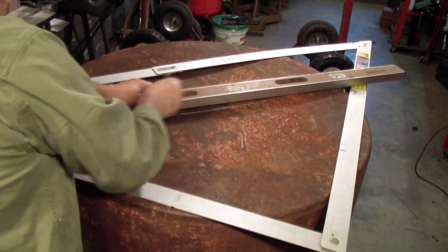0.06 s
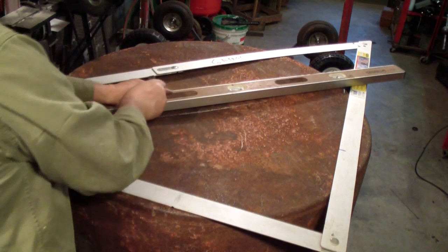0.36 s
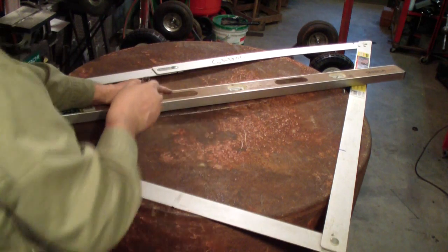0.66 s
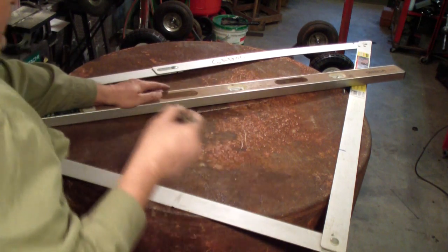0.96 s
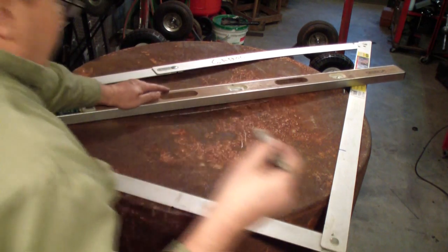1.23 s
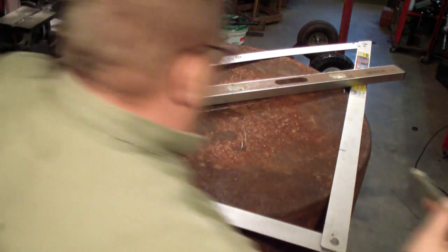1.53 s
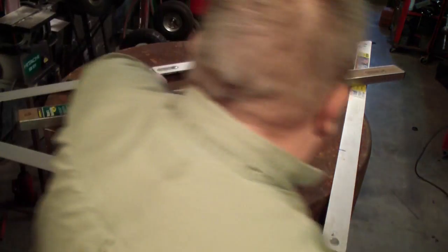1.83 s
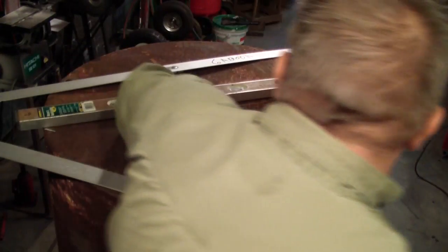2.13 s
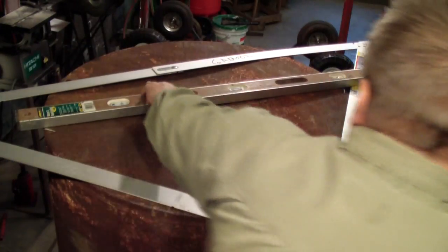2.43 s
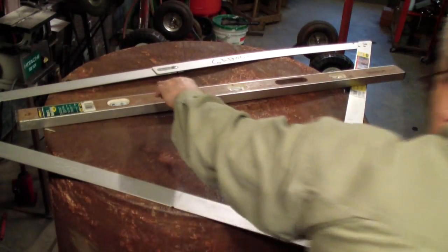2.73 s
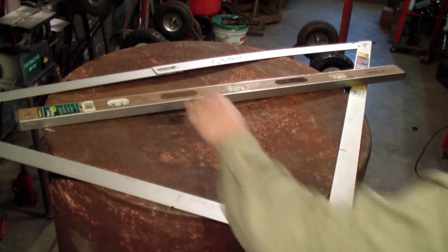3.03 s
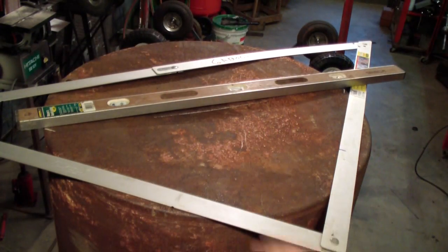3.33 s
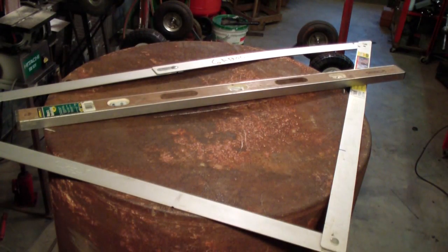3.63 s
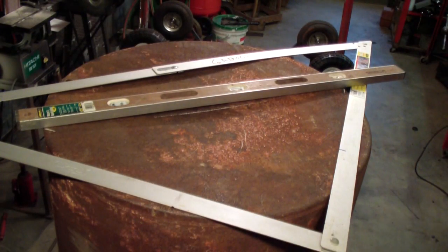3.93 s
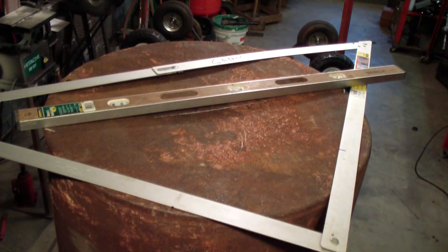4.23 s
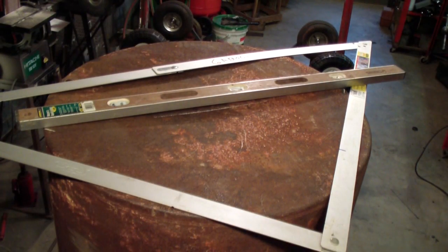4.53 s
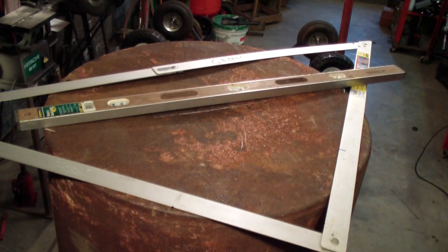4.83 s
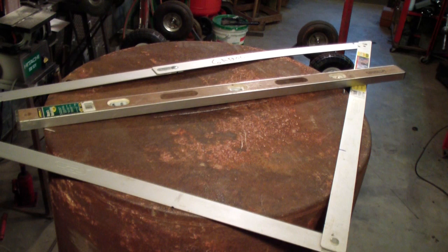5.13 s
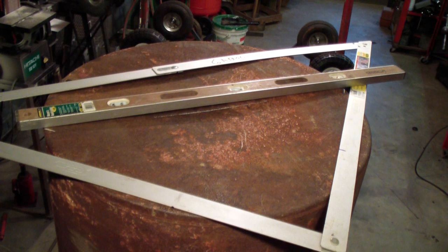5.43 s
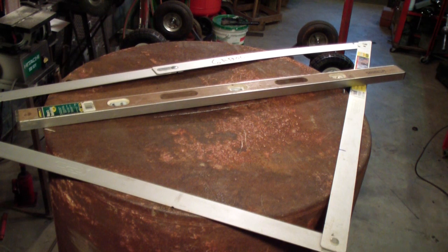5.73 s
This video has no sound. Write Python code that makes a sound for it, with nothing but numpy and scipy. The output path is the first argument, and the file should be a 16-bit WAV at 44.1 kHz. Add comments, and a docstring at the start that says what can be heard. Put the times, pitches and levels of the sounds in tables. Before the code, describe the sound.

It opens at once with chalk dragged hard along a straightedge on a big steel tank: a gritty hiss with tiny squeaks over a loud, hollow metallic roar. The stroke stops at about 0.4 seconds and the tank rings on, fading over two to three seconds. Metal rules give light, tinkling clicks near 0.5 and 1.7 seconds. A sleeve rustles softly from about 1.3 seconds on, and a few dull knocks come between 2.4 and 2.8 seconds. At 3 and 3.25 seconds a hand brushes over the rust in two quick, dry swipes, the first stronger. A shoe scuffs on gritty concrete near 3.9 seconds, then more faintly around 4.6. A small knock and click come at about 5.4 seconds. A lens motor chirps very faintly near 2.2 and 4.3 seconds. Everything is close, over a low rumble and the quiet air of a workshop.

```python
"""Chalk on a steel tank

Chalk is dragged hard along a straightedge on a big rusty steel tank in a workshop. Its tiny fractures
force the shell into vibration: the tank roars, then rings on in its natural modes. Friction sounds as
a hand brushes twice over the rust, a sleeve rustles and shoes scuff on concrete. Small impacts click
and knock, and a lens motor chirps faintly over a low rumble and the quiet air of the room."""
import sys
import numpy as np
from scipy import signal
from scipy.fft import rfft, irfft, next_fast_len
from scipy.io import wavfile

SR = 44100
rng = np.random.default_rng(int(sys.argv[2]) if len(sys.argv) > 2 else 0)


def materialize(psi):
    """Save the field psi as 16-bit PCM at rate SR to the path in sys.argv[1].

    A 1-D psi becomes a single channel; in a 2-D psi each row is a channel.
    """
    bounded = np.clip(np.atleast_2d(psi).T, -1, 1)
    quanta = np.round(bounded * 32767).astype(np.int16)
    wavfile.write(sys.argv[1], SR, quanta)


N = 258847
TIME = np.arange(N) / SR
LEAD, RINGING = SR // 2, 3 * SR + SR // 2   # samples of tank vibration before and after 0 s

# strongest modes of the shell: (frequency [Hz], relative level [dB], decay time T60 [s])
TANK_MODES = [(43.3, -41.5, 0.46), (60.1, -36, 3), (142.5, -49.5, 6), (167.1, -44, 4.73), (224.2, -43, 3.4),
              (244.5, -41.5, 1.7), (267.3, -43, 3), (287.6, -34.5, 0.35), (296, -46, 6.7),
              (315.7, -40, 2.4), (356, -36, 2.85), (418.3, -36, 3.9), (423.6, -37.5, 4.4),
              (521.5, -36, 2.93), (571, -40.5, 3.8), (593, -39.5, 3.63), (624, -40.5, 3), (650, -37.5, 1.5),
              (665, -37, 0.87), (701, -40, 1.3), (733.5, -40, 1.7), (809, -38.5, 2.24), (943, -44, 2.6),
              (978, -49, 1.9), (1095, -59, 1.2), (1160, -55, 0.86), (1376, -43, 1.4), (1637, -38, 1.4),
              (1760, -63, 1.8), (2270, -47, 1.55)]
# weaker, long-ringing modes: (frequency [Hz], relative level [dB]) and (frequency [Hz], T60 [s])
RINGING_SPECTRUM = [(150, -27), (250, -1.5), (450, -1), (800, 1.5), (1400, 1.5), (2000, -1.5), (2800, -11),
                    (4000, -22), (7000, -30), (12000, -37)]
RINGING_T60 = [(170, 2.2), (430, 3.8), (700, 2.38), (1100, 1.81), (1800, 1.45), (3000, 1.5), (6000, 1.6)]
# modes that radiate strongly and so die fast: the same two pairs of columns
DAMPED_SPECTRUM = [(150, -23), (250, -5), (450, 0.5), (800, 0), (1400, -3), (2000, -4.5), (2800, -10.5),
                   (4000, -21), (8000, -45)]
DAMPED_T60 = [(200, 0.68), (1000, 0.67), (4000, 0.26)]
def tank(modes_db, ringing_db, damped_db, release_s=0.39, release_db_per_s=209):
    """Forced vibration, then free decay: crumbling chalk drives the shell until the pressure is let go."""
    t = np.arange(-LEAD, RINGING) / SR
    pressure = from_db(-1 - release_db_per_s * np.maximum(t - release_s, 0))
    force = fractures(len(t), per_s=2000, spread_db=3.0)[0] * pressure
    strong = sum(from_db(db + modes_db) * unit_rms(shell_mode(force, hz, t60)[LEAD:])
                 for hz, db, t60 in TANK_MODES)
    ringing = from_db(ringing_db) * dense_modes(force, RINGING_SPECTRUM, RINGING_T60, spacing_hz=5.0)
    damped = from_db(damped_db) * dense_modes(force, DAMPED_SPECTRUM, DAMPED_T60, spacing_hz=6.0)
    return np.pad(strong + ringing + damped, ((0, 0), (0, N - RINGING)))


def shell_mode(force, hz, t60):
    """Energy balance: a mode stores and leaks energy; impulses jog its phase, so it clears once free."""
    retained = from_db(-120 / (t60 * SR))
    energy = signal.lfilter([1], [1, -retained], force ** 2) + 1e-12
    drift = np.cumsum(force * rng.standard_normal(len(force)) / np.sqrt(2 * energy))
    return np.sqrt(energy) * np.sin(2 * np.pi * hz * np.arange(len(force)) / SR + drift)


def dense_modes(force, spectrum, t60s, spacing_hz, count=2500):
    """Modal superposition: a thin shell has almost evenly spaced modes of random strength and phase."""
    size = 2 * SR
    bins = (np.arange(count) + rng.random(count)) * spacing_hz * size / SR
    amplitudes = rng.uniform(0.55, 1, count) * np.exp(2j * np.pi * rng.random((2, count)))
    lines = np.zeros((2, size // 2 + 1), complex)
    lines[:, np.minimum(bins.astype(int), size // 2)] = amplitudes
    response = band_decay(shaped_stereo(irfft(lines, size), spectrum, diffuse=0), t60s)
    return unit_rms(signal.fftconvolve(force[None], response, axes=1)[:, LEAD:len(force)])


def chalk_speed(stop_s=0.43):
    """Growing deceleration: the speed falls from 1 to 0 along a parabola."""
    return np.maximum(1 - (TIME / stop_s) ** 2, 0)


# hiss of the chalk tip: (frequency [Hz], relative level [dB])
TIP_SPECTRUM = [(1500, -11), (2800, 2), (4000, 1), (5500, -2.5), (7000, -3.5), (10000, -9.5), (12500, -20),
                (14000, -24), (16000, -37)]
def chalk_tip(level_db=-22, surge_db=0.7, surge_s=0.0198):
    """Friction noise follows a power of sliding speed, surging as the tip grips and crumbles."""
    knots = np.arange(40) * surge_s
    surges = from_db(surge_db * np.interp(TIME, knots, rng.standard_normal(len(knots))))
    gain = from_db(level_db) * chalk_speed() ** 1.25 * surges
    return friction(gain, TIP_SPECTRUM, per_s=3200, spread_db=1.0, diffuse=0)


# brief squeaks: (time [s], level [dB], duration [s], centre [Hz], width [octaves])
SQUEAKS = [(.044, -24.5, .01, 9730, 0.17), (.049, -22.5, 0.0087, 6870, 0.061),
           (.069, -26, 0.0068, 7060, 0.1), (.098, -26.5, 0.0077, 8100, 0.33),
           (5.695, -54.5, 0.034, 1440, 0.07)]
def squeaks():
    """Stick-slip motion, mostly of the chalk, gives narrow-band bursts."""
    return contacts(SQUEAKS, fade_s=0.0074, skirt_db=18)


# passes of the palm: (touch time [s], bite time [s], fall [s], skim [dB], bite [dB], dust [dB])
PALM_PASSES = [(3.036, 3.066, 0.075, -22, -19, -28), (3.239, 3.264, 0.061, -33.5, -23, -42)]
# rubbed rust and loose dust, each: (frequency [Hz], relative level [dB])
RUST_SPECTRUM = [(120, -46), (200, -22), (380, -9), (448, -19), (623, -7), (986, -13), (1100, -5),
                 (1320, -9.5), (1650, -4.5), (1910, -6), (2380, -1.5), (8580, -9.5), (16000, -31)]
DUST_SPECTRUM = [(3000, -27), (8000, 0), (11000, -2), (16000, -4)]
def hand(bite_rise_s=0.0031, dust_rise_s=0.0048, dust_fall_s=0.11):
    """Roughness noise: the palm skims the rust, bites and slides off, sweeping fine dust away."""
    skims, bites, dust = [], [], []
    for touch, bite, fall, skim_db, bite_db, dust_db in PALM_PASSES:
        skims.append((touch, bite - touch, 0, fall, skim_db))
        bites.append((bite, bite_rise_s, 0, fall, bite_db))
        dust.append((touch + dust_rise_s / 2, dust_rise_s, 0, dust_fall_s, dust_db))
    rust_gain = np.hypot(motion_gain(skims, power=0.98), motion_gain(bites, power=1.45))
    dust_gain = motion_gain(dust, power=0.87)
    return (friction(rust_gain, RUST_SPECTRUM, per_s=16000, spread_db=3.0, diffuse=0.11)
            + friction(dust_gain, DUST_SPECTRUM, per_s=10000, spread_db=4.0, diffuse=0.2))


# hard contacts: (time [s], level [dB], duration [s], centre [Hz], width [octaves], coupling [dB])
CLICKS = [(.511, -27.5, 0.006, 7740, 0.17, -27), (0.5125, -29, 0.0072, 4750, 0.21, -13),
          (.513, -37.5, 0.02, 11000, 0.42, -16), (0.634, -31, 0.0019, 7700, 0.85, -4),
          (1.623, -39, 0.021, 7860, 1, -6), (1.729, -38.5, 0.0088, 5850, 0.4, 3.5),
          (1.729, -44, 0.028, 11100, 0.62, 2), (2.634, -40, 0.0074, 6000, .8, -10),
          (3.247, -28, .001, 4440, 0.7, -8), (5.4746, -37.5, 0.0026, 5860, 0.63, -6)]
# modes of the metal rules: (frequency [Hz], relative level [dB], T60 [s])
RULE_MODES = [(4540, -2, .2), (4470, -6, .22), (4915, 1, 0.13), (5140, 4.5, 0.11), (5930, -2, 0.2),
              (6070, -5, 0.19), (6230, -3, 0.23), (7560, 4, .15), (7740, -12, .12), (8100, -11, .15),
              (10450, -7, .16), (11220, -11, .14), (11935, -8, .12)]
def clicks(ring_db):
    """Impact excitation: each hard contact clicks and couples into the metal rules, which tinkle."""
    direct = contacts([row[:5] for row in CLICKS], fade_s=0.0025, skirt_db=14)
    coupled = [(time, db + coupling_db, *shape) for time, db, *shape, coupling_db in CLICKS]
    force = contacts(coupled, fade_s=0.0029, skirt_db=12)
    tinkle = sum(from_db(db) * resonator(force, hz, t60) for hz, db, t60 in RULE_MODES)
    return direct + from_db(ring_db) * tinkle


# dull knocks and footfalls: (time [s], level [dB], duration [s], centre [Hz], width [octaves])
KNOCKS = [(1.712, -42, 0.029, 835, 0.9), (2.43, -40, 0.011, 1170, 1), (2.553, -30.5, 0.0062, 233, 0.52),
          (2.662, -34.5, 0.013, 666, 0.49), (2.755, -41, 0.013, 148, 0.71), (2.805, -44, 0.011, 1290, 0.89),
          (3.862, -36.5, 0.016, 110, 1), (4.555, -42.5, 0.0097, 450, 1), (5.404, -38.5, 0.016, 820, 0.67),
          (5.408, -41, 0.024, 3150, 0.77)]
def knocks():
    """Heavily damped impacts: broad resonances that die almost at once."""
    return contacts(KNOCKS, fade_s=0.0051, skirt_db=16.5)


# slides of a shoe: (start [s], rise [s], hold [s], fall [s], level [dB])
SCUFFS = [(3.855, .11, .12, .1, -28), (4.53, 0.16, 0.078, 0.21, -41.5), (4.87, .08, .01, .07, -46)]
# sole on concrete: (frequency [Hz], relative level [dB])
SCUFF_SPECTRUM = [(71, -51), (120, -26), (147, -18), (308, -9.5), (348, -8), (385, -8), (463, -17),
                  (546, -7), (1290, -4), (1400, -6), (1520, -6), (4140, -10), (6770, -7), (16000, -21.5)]
def shoes():
    """Sliding friction of soles on gritty concrete."""
    gain = motion_gain(SCUFFS, power=0.83)
    return friction(gain, SCUFF_SPECTRUM, per_s=14000, spread_db=3.0, diffuse=0.041)


# arm and body movements: (start [s], rise [s], hold [s], fall [s], cloth [dB], rumble [dB])
BODY_MOVES = [(1.281, 0.22, 0.13, 0.27, -47, -58), (1.7, 0.26, .3, 0.23, -53, -65),
              (2.253, 0.15, .15, 0.45, -43, -38.5), (2.56, 0.072, .01, 0.18, -42.5, -48),
              (2.75, 0.27, 0.37, 0.73, -50, -46), (3.55, 0.28, 0.034, 0.32, -47.5, -60),
              (4.3, 0.24, 0.54, 0.19, -54.5, -60), (5.714, 0.12, .01, 0.044, -46, -67)]
# rustling cloth: (frequency [Hz], relative level [dB])
SLEEVE_SPECTRUM = [(100, -14), (400, 7.5), (1000, 4), (2200, 2.5), (4000, 0.5), (6500, 0.5), (10000, -4.5),
                   (16000, -14)]
def sleeve():
    """Friction of cloth follows the speed of the arm and body."""
    gain = motion_gain([row[:5] for row in BODY_MOVES], power=0.76)
    return friction(gain, SLEEVE_SPECTRUM, per_s=12000, spread_db=2.5, diffuse=0.38)


# runs of a tiny motor: (start [s], end [s], mean pitch [Hz], level [dB])
MOTOR_RUNS = [(2.137, 2.317, 1930, -52), (2.328, 2.45, 2110, -49), (4.157, 4.32, 1960, -53.5),
              (4.353, 4.64, 1940, -53.5)]
def lens_motor(steps_per_s=29.9, wander_hz=29.7):
    """Stepping modulates a tone: each step is a faint chirp of slightly different pitch."""
    out = 0
    for start, end, hz, db in MOTOR_RUNS:
        steps = np.clip(TIME - start, 0, end - start) * steps_per_s
        pitch = hz + wander_hz * rng.standard_normal(32)[steps.astype(int)]
        pulses = (TIME < end) * np.sin(np.pi * steps) ** 2
        out = out + from_db(db) * pulses * np.sin(2 * np.pi * np.cumsum(pitch) / SR)
    return out


# low rumble: (frequency [Hz], relative level [dB])
RUMBLE_SPECTRUM = [(15, -5), (32, -5), (45, -6.5), (70, -11), (130, -18), (300, -20.5), (900, -44)]
def rumble(arm_db=-38, background_db=-45, settle_db_per_s=1.5):
    """Incoherent addition: air stirred by arm and body sums in power with a settling background."""
    body = motion_gain([(*timing, db) for *timing, _, db in BODY_MOVES], power=1.0)
    arm = from_db(arm_db) * chalk_speed()
    background = from_db(background_db - settle_db_per_s * TIME)
    return np.sqrt(body ** 2 + arm ** 2 + background ** 2) * noise(N, RUMBLE_SPECTRUM, diffuse=0.1)


# quiet air of the workshop: (frequency [Hz], relative level [dB])
AIR_SPECTRUM = [(12, -68), (20, -2), (60, -0.5), (81, -12), (163, -11), (222, -19), (262, -17.5),
                (319, -19), (499, -20), (780, -22.5), (2670, -23.5), (2910, -25), (4300, -27),
                (12100, -31.5), (16000, -39)]
def room_air(level_db=-46):
    """A diffuse field: steady noise arrives from all around."""
    return from_db(level_db) * noise(N, AIR_SPECTRUM, diffuse=0.98)


# reverberation time of the workshop: (frequency [Hz], T60 [s])
ROOM_T60 = [(100, 0.33), (1000, 0.3), (4000, 0.4), (14000, 0.32)]
def workshop(direct, wet_db):
    """Reverberation: the scattered reflections of a cluttered room follow the direct sound by 5 ms."""
    tail = band_decay(noise(SR // 2, [(100, -0.46), (16000, -1.5)], diffuse=0.21), ROOM_T60)
    tail = np.pad(tail, ((0, 0), (SR // 200, 0)))
    return direct + from_db(wet_db) * signal.fftconvolve(direct.mean(0)[None], tail, axes=1)[:, :N]


def fractures(size, per_s, spread_db):
    """A Poisson process: two independent trains of tiny fractures of uneven strength."""
    occurs = rng.random((2, size)) < per_s / SR
    strength = from_db(spread_db * np.minimum(rng.exponential(1, (2, size)), 4))
    return occurs * strength * rng.choice([-1, 1], (2, size))


def friction(gain, spectrum, per_s, spread_db, diffuse):
    """Shot noise: rubbing gives dense impulses whose strength follows the movement."""
    start, end = np.flatnonzero(gain)[[0, -1]]
    grains = shaped_stereo(fractures(end - start, per_s, spread_db), spectrum, diffuse)
    return gain * np.pad(grains, ((0, 0), (start, N - end)))


def motion_gain(moves, power):
    """Power law: amplitude follows a speed that rises, holds and falls; overlapping energies add."""
    energy = 0
    for start, rise, hold, fall, db in moves:
        speed = np.clip(np.minimum((TIME - start) / rise, 1 - (TIME - start - rise - hold) / fall), 0, 1)
        energy = energy + (from_db(db) * speed ** power) ** 2
    return np.sqrt(energy)


def contacts(rows, fade_s, skirt_db):
    """Transient excitation: each contact chatters around one resonance, then decays exponentially."""
    out, t = np.zeros((2, N + SR)), np.arange(SR // 4) / SR
    hz = np.geomspace(20, 20000, 300)
    for time, db, duration, centre_hz, octaves in rows:
        resonance_db = -skirt_db * np.log10(1 + (np.log2(hz / centre_hz) / octaves) ** 2)
        burst = noise(len(t), np.column_stack([hz, resonance_db]), diffuse=0.11)
        attack = np.minimum(t / (duration / 10), 1)
        decay = np.exp(-np.maximum(t - duration, 0) / (fade_s + duration / 4))
        start = round(time * SR)
        out[:, start:start + len(t)] += from_db(db) * burst * attack * decay
    return out[:, :N]


def resonator(force, hz, t60):
    """A damped harmonic oscillator driven by a force."""
    radius, angle = np.exp(-np.log(1000) / (t60 * SR)), 2 * np.pi * hz / SR
    return signal.lfilter([0, np.sin(angle)], [1, -2 * radius * np.cos(angle), radius ** 2], force + 1e-18)


def band_decay(sound, t60s):
    """Frequency-dependent damping: each half octave decays at its own rate; unit energy."""
    size = sound.shape[1]
    t, spectrum = np.arange(size) / SR, rfft(sound)
    half_octaves = 2 * np.log2(np.maximum(np.arange(size // 2 + 1) * SR / size, 1))
    out = 0
    for k in range(13, 29):
        band = irfft(spectrum * np.maximum(1 - abs(half_octaves - k), 0), size)
        out = out + band * from_db(-60 * t / at_hz(t60s, 2 ** (k / 2)))
    return out / np.sqrt(np.sum(out ** 2) / 2)


# stereo width of frontal and of diffuse sound, each: (frequency [Hz], side minus mid [dB])
FRONTAL_WIDTH = [(60, -11), (170, -29), (350, -20.5), (700, -19), (1400, -17), (2800, -12), (5600, -5.5),
                 (10000, -4), (14000, 0)]
DIFFUSE_WIDTH = [(60, -9), (170, 0), (700, -2), (1400, -3), (2800, -2.5), (5600, 0), (14000, 1.5)]
def shaped_stereo(pair, spectrum, diffuse):
    """Partial coherence: two unrelated signals are filtered into mid and side (diffuse 0-1); rms 1."""
    size = pair.shape[1]
    padded = next_fast_len(size, True)
    hz = np.arange(padded // 2 + 1) * SR / padded
    mid, side = rfft(pair, padded) * from_db(at_hz(spectrum, hz)) * (hz > 12)
    side = side * from_db((1 - diffuse) * at_hz(FRONTAL_WIDTH, hz) + diffuse * at_hz(DIFFUSE_WIDTH, hz))
    return unit_rms(irfft(np.array([mid + side, mid - side]), padded)[:, :size])


def noise(size, spectrum, diffuse):
    """Filtered Gaussian noise in stereo; rms 1."""
    return shaped_stereo(rng.standard_normal((2, size)), spectrum, diffuse)


def at_hz(points, hz):
    """Interpolation on a log-frequency axis."""
    freqs, values = np.transpose(points)
    return np.interp(np.log(np.maximum(hz, 1)), np.log(freqs), values)


def from_db(db):
    return 10 ** (np.asarray(db) / 20)


def unit_rms(x):
    return x / np.sqrt(np.mean(x ** 2) + 1e-20)


def scene():
    """Superposition of all sources; hand, shoes, sleeve and brief contacts also excite the room."""
    steel = tank(modes_db=-3.5, ringing_db=-28.5, damped_db=-25.5)
    rustle = shoes() + sleeve()
    transients = clicks(ring_db=-41.0) + knocks() + squeaks()
    air = room_air()
    near = chalk_tip() + workshop(hand() + rustle, wet_db=-7.5) + workshop(transients, wet_db=-5.0)
    return steel + near + rumble() + air + lens_motor()


def record(dry):
    """Band limiting: a steep low-pass filter removes the highest treble."""
    return signal.sosfilt(signal.ellip(12, 0.1, 90, 15900, fs=SR, output="sos"), dry)


dry = scene()
out = record(dry)
materialize(out)
```